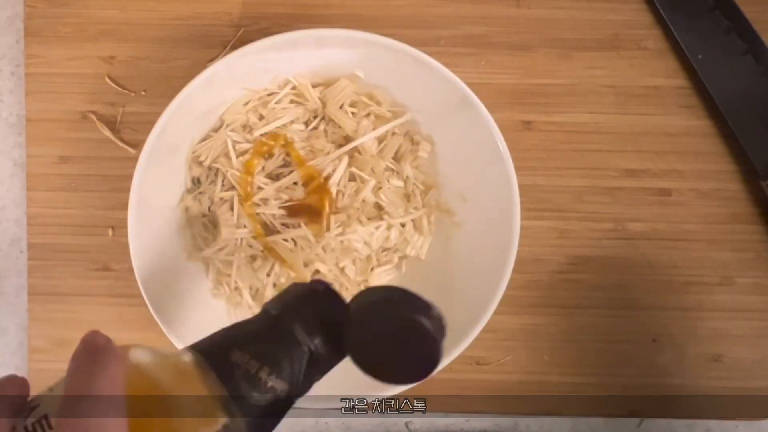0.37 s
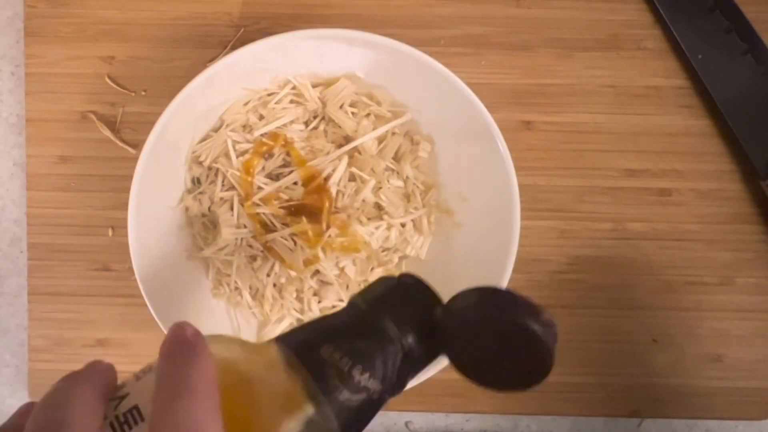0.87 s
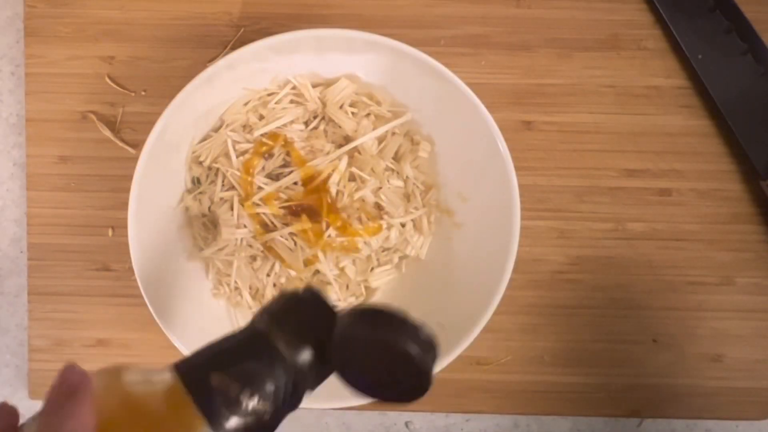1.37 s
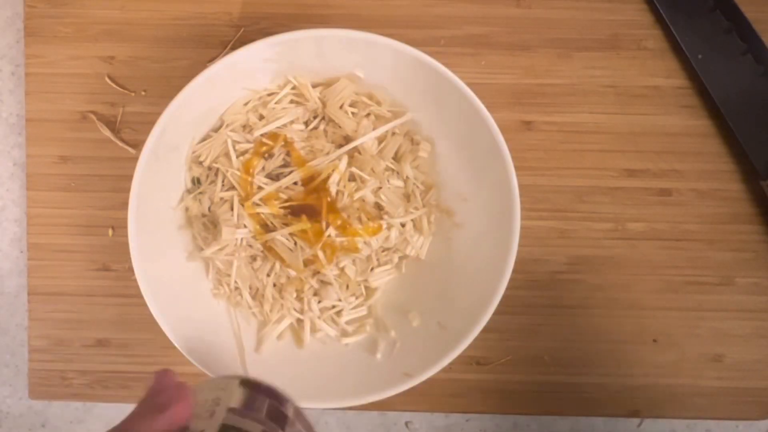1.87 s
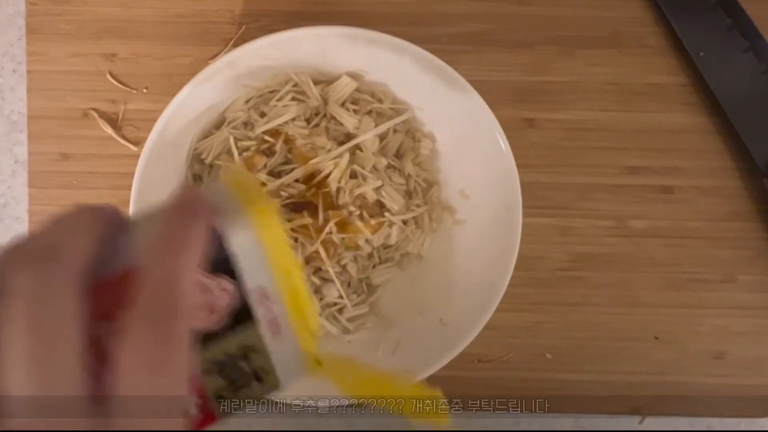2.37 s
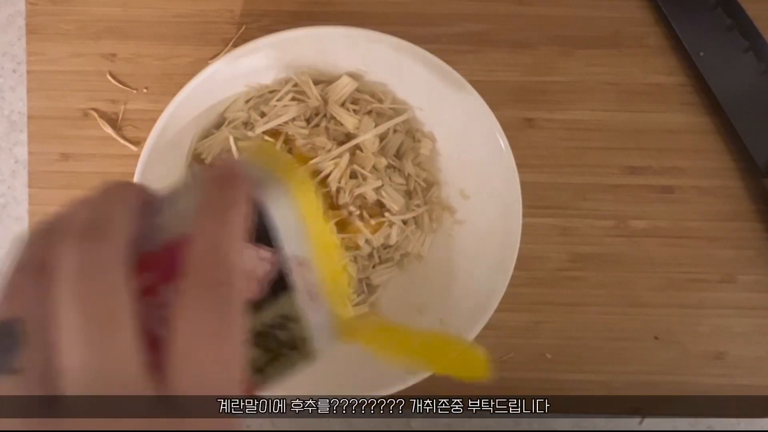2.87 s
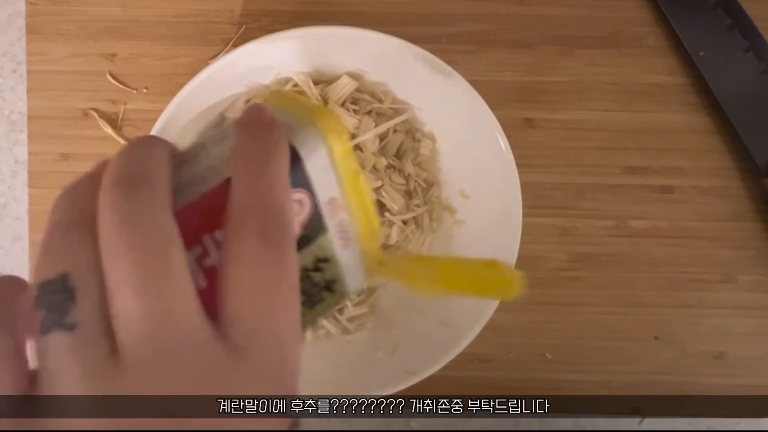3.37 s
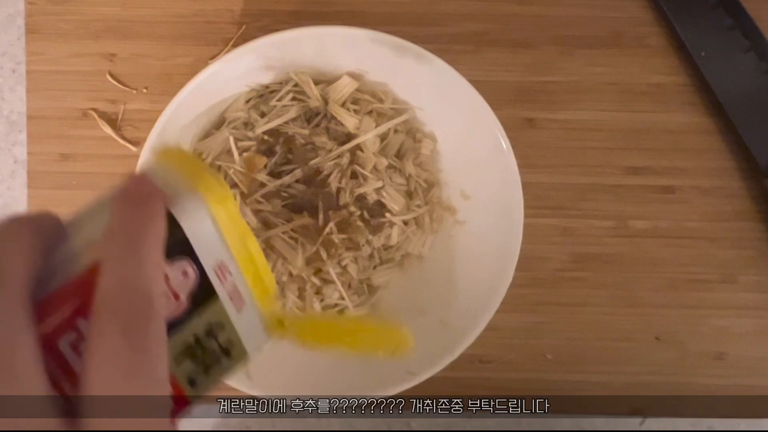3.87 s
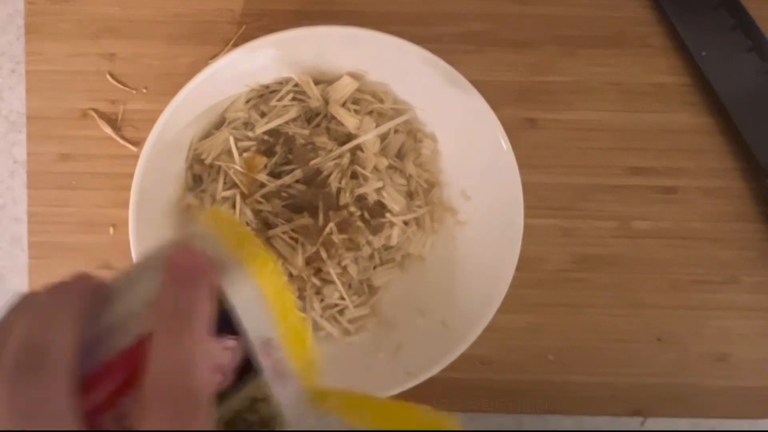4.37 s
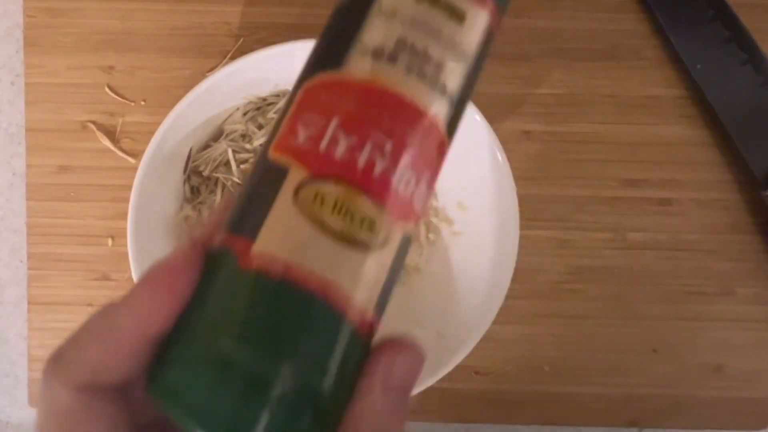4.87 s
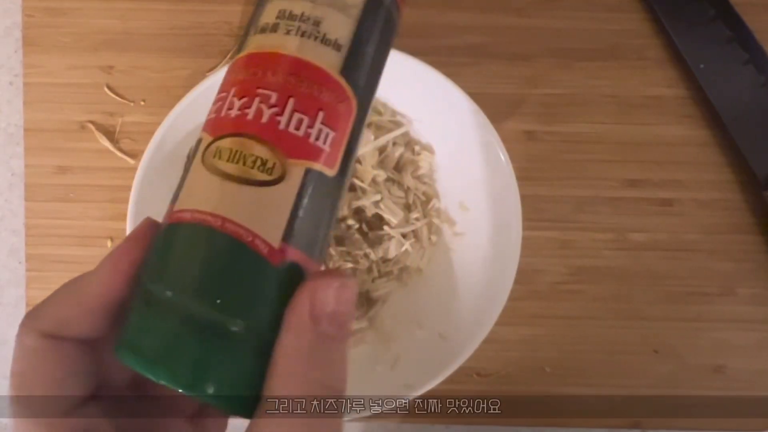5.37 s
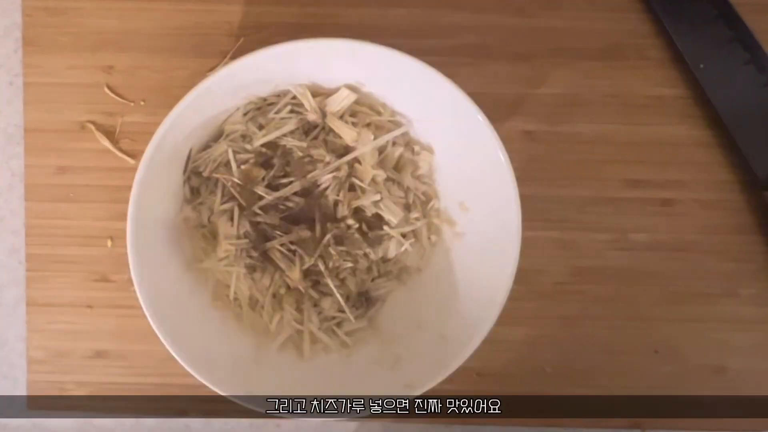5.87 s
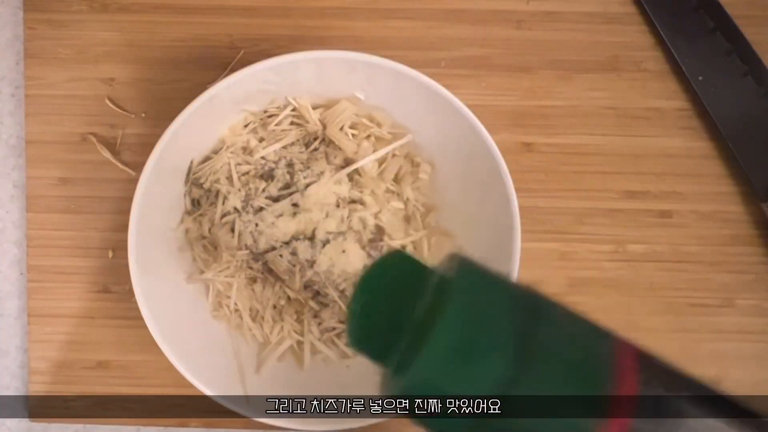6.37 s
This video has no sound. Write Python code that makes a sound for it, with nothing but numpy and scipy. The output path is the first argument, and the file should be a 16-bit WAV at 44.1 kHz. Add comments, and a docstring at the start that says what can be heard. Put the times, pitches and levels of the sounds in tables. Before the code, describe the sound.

A low electrical-sounding hum with a thin whine and airy rush runs through four shots, separated by tiny clicks and near silence. The first is almost only hum; the second has dry swishing pepper shakes; the third is quiet handling; the last has a crisp plastic lid tick and brief sliding powder. Near microphone in a small, dry kitchen.

```python
"""Seasoning by a humming motor

A pepper tin is shaken: swarms of tiny hits ring its walls. Hands rustle on plastic in the same way.
A shaker's lid ticks as short decaying tones; its tube and nozzle are noise in narrow resonances.
A motor hums and whines and its fan rushes; faint handling hiss and a small kitchen surround all this.
Three joins, each a clipped fade-out, near silence and a fade-in, part the sound into four shots."""
import sys
import numpy as np
from scipy import signal
from scipy.fft import rfft, irfft, next_fast_len
from scipy.io import wavfile

SR = 44100
rng = np.random.default_rng(int(sys.argv[2]) if len(sys.argv) > 2 else 0)


def gain_from_db(level_db):
    """Convert decibel levels to linear amplitude factors (20 dB per decade)."""
    decades = np.asarray(level_db, float) / 20
    return 10 ** decades


def put_to_file(sound):
    """Save the sound as 16-bit audio at rate SR, in the file named by the first command-line argument."""
    columns = np.atleast_2d(sound).T  # one column per channel
    safe = np.clip(columns, -1, 1)
    whole_steps = np.round(safe * 32767)
    wavfile.write(sys.argv[1], SR, whole_steps.astype(np.int16))


N = 286209   # samples

# pepper thrown about in the tin: start_s, level_db (before ringing), centre_hz,
# breadth_octaves (distance at which it is 9 dB down), rise_s
SHAKES = [(2.30, -74, 5020, 0.82, .02), (2.455, -70, 6500, 1.4, 0.024), (2.619, -85, 6950, 1.2, 0.01),
          (3.100, -69.5, 2380, 0.74, .005), (3.228, -72, 5400, 1.1, 0.011), (3.385, -73, 4520, 0.71, 0.026),
          (3.417, -59.5, 4000, 1.06, 0.016), (3.532, -56.5, 3400, 0.93, 0.026),
          (3.65, -81.5, 7500, 0.91, .025), (3.805, -68.5, 3000, 1.2, 0.011),
          (3.902, -54, 2570, 1.5, 0.0021), (3.94, -69.5, 2600, 1.1, .012),
          (4.108, -60.5, 1900, 0.37, 0.016), (4.164, -69, 2620, 1.4, 0.0049),
          (4.305, -72.5, 6540, 1.1, 0.018)]
# resonances of the tin's walls: pitch_hz, width_hz, relative_level_db
TIN_WALLS = [(1360, 540, -1), (1666, 430, 2.5), (2170, 480, -0.5), (2677, 260, 2.5), (3190, 180, -3.5),
             (3860, 960, -4.5), (4560, 490, -7), (5770, 380, -1.5), (6330, 480, -3.5), (6800, 600, -10),
             (8050, 800, -11.5), (10400, 3000, -11), (14000, 3200, -17)]
# fingers slipping on plastic and powder sliding: columns as in SHAKES
RUSTLES = [(.345, -87, 3440, 0.71, .03), (.441, -71, 2850, .4, 0.0039), (.455, -80, 4280, 0.49, 0.017),
           (1.589, -87, 14000, .33, .003), (1.608, -83, 5000, 0.61, 0.0065), (4.655, -86, 6000, 1.3, 0.023),
           (5.197, -87, 4900, 0.86, .02), (5.498, -81, 3980, 0.54, .012), (5.80, -87, 5500, 1.1, .03),
           (6.05, -66, 9100, 1.5, 0.027), (6.098, -68, 5980, 1.2, 0.017), (6.365, -100, 14000, .44, .015),
           (6.46, -72.5, 7050, 1.3, 0.023)]
# broad colour of the rustles: pitch_hz, width_hz, relative_level_db
PLASTIC_COLOUR = [(2300, 450, -6.5), (3000, 420, 6), (4200, 1300, 2.5), (6040, 3400, 7), (7500, 1400, -4),
                  (10700, 3500, -0.5), (14500, 2500, -6.5)]
SHAKE_T60_S, RUSTLE_T60_S = 0.2, 0.13

# ticks of the shaker lid: start_s, level_db (before onset ramp and decay), pitch_hz
LID_TICKS = [(6.065, -44, 9000), (6.076, -21, 5830), (6.0945, -40, 3680), (6.1042, -44, 4200)]
TICK_T60_S = 0.0037

# air in the shaker's tube as it is tipped: swells until TUBE_FULL_S, then holds
TUBE_HZ, TUBE_WIDTH_HZ = 2370, 110
TUBE_FULL_S, TUBE_DB, TUBE_SWELL_DB_PER_S = 6.43, -65, 77.5

# breathy nozzle tones: pitch_hz, width_hz (of each of two filters), relative_level_db
NOZZLE_TONES = [(4500, 400, -1), (6000, 350, 0), (7570, 350, -2)]
NOZZLE_FROM_S, NOZZLE_TO_S, NOZZLE_EDGE_S, NOZZLE_DB = 1.57, 1.99, 0.05, -92

# hands and sleeves moving: time_s, level_db (rms, before flicker)
HANDLING_LEVEL = [(0, -87.5), (.5, -82), (1, -85), (1.9, -82), (2.4, -80.5), (3.2, -78), (3.7, -74),
                  (4.05, -79.5), (4.4, -74), (4.8, -81.5), (5.6, -83.5), (5.9, -76.5), (6.2, -79),
                  (6.43, -77.5), (6.49, -65.5)]
# colour of the handling hiss: frequency_hz, relative_density_db (per Hz)
HANDLING_COLOUR = [(1500, -20), (3000, -3.5), (4500, 3.5), (5500, 3), (8000, -2.5), (11000, -9.5),
                   (15000, -12)]

HUM_HZ = 59.385   # the running speed
# motor hum: multiple of the running speed, left_level_db (rms), right_level_db (rms)
HUM_TONES = [(1, -33.5, -33.5), (2, -55, -58), (3, -61.5, -60.5), (4, -63, -65), (5, -67.5, -70),
             (7, -63, -89.5), (10, -67, -57.5)]

# whine in each shot: shot_end_s, level_db (rms, midway between the channels, before wavering)
WHINE_SHOTS = [(2.05, -74), (4.47, -77), (5.97, -78), (6.5, -72)]
WHINE_HZ, WHINE_SPREAD_HZ = 2262, 34

# fan rush: frequency_hz, relative_density_db (per Hz)
RUSH_COLOUR = [(15, -23.5), (36, -12.5), (82, -2.5), (140, -10.5), (300, -12), (450, -18.5), (600, -9),
               (880, -21), (1100, -20), (1500, -28.5), (2100, -32.5), (2900, -41.5), (4500, -57.5),
               (8000, -58.5), (14000, -77.5)]
RUSH_DB = -50   # rms
# housing resonances rung by the air flow: pitch_hz, width_hz, level_db (rms), left_minus_right_db
HOUSING = [(157, 12, -60.5, 0), (268, 14, -61, -1.5), (548.2, 30, -62.5, 2.5), (633.7, 23, -62, -10.5),
           (962.5, 32, -64.5, -5), (1191, 22, -78.5, -2.5), (1325, 70, -70.5, -3), (1727, 55, -79.5, -3),
           (2960, 450, -108.5, -2.5), (9450, 150, -104.5, -2)]

KITCHEN_T60_S, KITCHEN_DB = 0.12, -3.5
# likeness of spread-out sound at the two microphone ports: frequency_hz, likeness (0-1)
LIKENESS = [(60, .998), (200, 0.98), (300, 0.7), (400, 0.6), (550, 0.6), (700, 0.07), (1800, 0.5),
            (2500, 0), (4000, 0.2), (7000, 0.2), (14000, 0.6)]
# delay of the left port by the housing: frequency_hz, lag_cycles
PORT_LAG = [(20, 0), (60, .0027), (500, .01), (900, .5), (1500, 1), (2100, 1.05), (2600, 1.5), (3500, 2),
            (4300, 2.06), (5200, 2.35), (7000, 2.5), (8000, 3), (8800, 3.24), (16000, 3.26)]

# joins: cut_s, fade_in_start_s, jump_db (offset of the wave at the cut)
JOINS = [(2.0208, 2.061, -47.5), (4.435, 4.498, -58), (5.9438, 6.005, -45)]
FADE_OUT_S, CUT_LEVEL_DB, FADE_IN_S, FADE_IN_CURVE = 0.081, -10.5, 0.15, 1.48
AFTER_CUT_DB, AFTER_CUT_DB_PER_S = -43, -1200   # a faint trace dies into silence


def rms_one(x):
    """Scales to rms 1."""
    return x / np.sqrt(np.mean(x ** 2) + 1e-20)


def at_hz(points, size):
    """Reads a frequency curve at the bins of a transform, on a log frequency scale."""
    hz, value = np.transpose(points)
    bins_hz = np.arange(size // 2 + 1) * SR / size
    return np.interp(np.log(bins_hz + 1e-3), np.log(hz), value)


def drift(rate):
    """Slow random wander of rms 1, changing about rate times a second."""
    r = np.exp(-2 * np.pi * rate / SR)
    wander = signal.lfilter([1], [1, -2 * r, r * r], rng.standard_normal(N + SR))
    return rms_one(wander[SR:])   # the first second settles the filter


def resonate(x, hz, width):
    """Two-pole resonance with gain 1 on top."""
    r = np.exp(-np.pi * width / SR)
    poles = [1, -2 * r * np.cos(2 * np.pi * hz / SR), r * r]
    return signal.lfilter([(1 - r * r) / 2, 0, (r * r - 1) / 2], poles, x + 1e-18)


def panned(x, left_minus_right_db):
    """Two channels from one, by level alone."""
    return x * gain_from_db(np.array([[0.5], [-0.5]]) * left_minus_right_db)


def coloured(spectrum):
    """Stereo noise of a given spectrum and rms 1, as alike at the ports as LIKENESS says."""
    size = next_fast_len(N)
    alike = np.clip(at_hz(LIKENESS, size), 0, 1)
    mid, side = rfft(rng.standard_normal((2, size))) * gain_from_db(at_hz(spectrum, size))
    both = np.sqrt(1 + alike) * mid + np.sqrt(1 - alike) * side * [[1], [-1]]
    return rms_one(irfft(both, size)[:, :N])


def grain_bursts(events, modes, t60, per_s, spread_db):
    """Each burst is a swarm of tiny hits that swells, dies away and rings modes around its centre pitch."""
    struck = rng.random(N) < per_s / SR
    size = gain_from_db(spread_db * np.minimum(rng.exponential(1, N), 4))
    grains = rms_one(struck * size * rng.choice([-1, 1], N))
    dealt = rng.random((len(modes), N)) < 0.5   # each mode gets its own half of the hits
    out = np.zeros(N)
    for hits, (hz, width, mode_db) in zip(dealt * grains, modes):
        swell = np.zeros(N)
        for s, db, centre_hz, octaves, rise in events:
            first = int(s * SR)
            t = np.arange(min(SR // 2, N - first)) / SR
            attack = np.minimum(t / max(rise, 1e-3), 1)
            decay = gain_from_db(-60 * np.maximum(t - rise, 0) / t60)
            distance = np.log2(hz / centre_hz) / octaves
            swell[first:][:len(t)] += attack * decay * gain_from_db(db - 9 * distance ** 2)
        rung = resonate(resonate(hits * swell, hz, width), hz, 3 * width)   # twice: steep skirts
        out += gain_from_db(mode_db) * rung * np.sqrt(SR / width)   # evens out narrow and wide modes
    return out


def pepper_tin():
    """Pepper grains strike the tin and ring its walls."""
    return grain_bursts(SHAKES, TIN_WALLS, SHAKE_T60_S, per_s=3700, spread_db=2.5)


def plastic_rustles():
    """Many small slips of skin and powder excite the broad resonances of plastic."""
    return grain_bursts(RUSTLES, PLASTIC_COLOUR, RUSTLE_T60_S, per_s=4500, spread_db=1.0)


def lid():
    """Dry ticks of hard plastic: fast-decaying tones whose first two cycles ramp up."""
    out, t = np.zeros(N), np.arange(SR // 20) / SR
    for s, db, hz in LID_TICKS:
        onset = np.minimum(t * hz / 2, 1)
        tick = gain_from_db(db - 60 * t / TICK_T60_S) * onset * np.sin(2 * np.pi * hz * t)
        out[int(s * SR):][:len(t)] += tick
    return out


def tube():
    """Noise in one hollow resonance, swelling as the tube is tipped."""
    air = resonate(rng.standard_normal(N), TUBE_HZ, TUBE_WIDTH_HZ)
    air = resonate(air, TUBE_HZ, TUBE_WIDTH_HZ)
    until_full = np.minimum(np.arange(N) / SR - TUBE_FULL_S, 0)
    return rms_one(air) * gain_from_db(TUBE_DB + TUBE_SWELL_DB_PER_S * until_full)


def nozzle():
    """Breathy pipe tones: noise in narrow resonances, each wandering in level."""
    air, t = rng.standard_normal(N), np.arange(N) / SR
    flowing = np.clip(np.minimum(t - NOZZLE_FROM_S, NOZZLE_TO_S - t) / NOZZLE_EDGE_S, 0, 1)
    out = np.zeros(N)
    for hz, width, db in NOZZLE_TONES:
        tone = rms_one(resonate(resonate(air, hz, width), hz, width))
        out += flowing * gain_from_db(NOZZLE_DB + db + 5.6 * drift(15)) * tone
    return out


def handling():
    """Faint cloth and skin hiss: coloured noise that flickers in level."""
    s, db = np.transpose(HANDLING_LEVEL)
    level_db = np.interp(np.arange(N) / SR, s, db)
    return gain_from_db(level_db + 1.3 * drift(9)) * coloured(HANDLING_COLOUR)


def hum():
    """Motor tones at steady multiples of the running speed that waver slightly in level together."""
    turn = 2 * np.pi * HUM_HZ * np.arange(N) / SR
    tones = np.zeros((2, N))
    for k, left_db, right_db in HUM_TONES:
        start = rng.uniform(0, 2 * np.pi)
        tones += np.sin(k * turn + start) * gain_from_db(np.array([[left_db], [right_db]]))
    return np.sqrt(2) * tones * gain_from_db(0.25 * drift(2))   # root two: sine of rms 1


def whine():
    """The motor's thin whine: a narrow band of noise about one pitch, stronger on the left."""
    ends, db = np.transpose(WHINE_SHOTS)
    t = np.arange(N) / SR
    turn = 2 * np.pi * WHINE_HZ * t
    band = drift(WHINE_SPREAD_HZ) * np.cos(turn) + drift(WHINE_SPREAD_HZ) * np.sin(turn)
    shot = np.minimum(np.searchsorted(ends, t), len(db) - 1)
    return gain_from_db(db[shot] + 1.5 * drift(1.5)) * panned(band, 9)


def fan():
    """Broad rush plus narrow bands where the housing rings, each partly unrelated at the two ports."""
    out, white = gain_from_db(RUSH_DB) * coloured(RUSH_COLOUR), rng.standard_normal((3, N))
    for hz, width, db, pan_db in HOUSING:
        each = width * 1.5   # two filters in a row narrow the band to about the given width
        shared, left, right = resonate(resonate(white, hz, each), hz, each)
        alike = np.clip(np.interp(hz, *np.transpose(LIKENESS)), 0, 1)
        ringing = np.sqrt(alike) * shared + np.sqrt(1 - alike) * np.array([left, right])
        out += gain_from_db(db) * panned(rms_one(ringing), pan_db)
    return out * gain_from_db(0.5 * drift(14))


def kitchen(x):
    """Room reverberation: a dense tail of decaying noise, another one at each port."""
    t = np.arange(SR // 2) / SR
    tails = rng.standard_normal((2, len(t))) * gain_from_db(-60 * t / KITCHEN_T60_S) * (t > 0.003)
    tails /= np.sqrt(np.sum(tails ** 2, axis=1, keepdims=True))
    return signal.fftconvolve(x[None], tails, axes=1)[:, :N]


def ports(x):
    """The housing makes the left port hear everything late by an amount that depends on pitch."""
    spare = SR // 10   # mirrored run-in and run-out
    longer = np.pad(x[0], spare, mode="reflect", reflect_type="odd")
    size = next_fast_len(len(longer))
    late = irfft(rfft(longer, size) * np.exp(-2j * np.pi * at_hz(PORT_LAG, size)), size)
    return np.array([late[spare:spare + N], x[1]])


def scene():
    """Near sounds with their room, over the motor and fan."""
    near = panned(pepper_tin(), 1.5) + panned(plastic_rustles() + nozzle(), 0.3) + panned(tube(), 6)
    ticks = lid()   # closest to the ports, so less of the room
    room = gain_from_db(KITCHEN_DB) * kitchen(near.mean(axis=0) + gain_from_db(-11.5) * ticks)
    return near + panned(ticks, -2) + room + handling() + hum() + whine() + fan()


def roll_off(x):
    """The treble ends steeply here."""
    return signal.sosfilt(signal.butter(12, 15750, fs=SR, output="sos"), x)


def record(dry):
    """At each join the fade-out is cut short with a jump in the wave; near silence, then a fade-in."""
    t, gain, jumps = np.arange(N) / SR, np.ones(N), np.zeros(N)
    for cut_s, in_s, jump_db in JOINS:
        fade_times = [cut_s - FADE_OUT_S, cut_s - 0.003, cut_s]
        fade_out = np.interp(t, fade_times, [1, gain_from_db(CUT_LEVEL_DB), 0])
        fade_in = np.clip((t - in_s) / FADE_IN_S, 0, 1) ** FADE_IN_CURVE
        trace = gain_from_db(AFTER_CUT_DB + AFTER_CUT_DB_PER_S * np.maximum(t - cut_s, 0))
        gain *= np.where(t < cut_s, fade_out, np.maximum(fade_in, trace))
        ramp = np.clip(1 - (cut_s - t) / 0.0012, 0, 1)   # rises over 1.2 ms, then drops at the cut
        jumps += gain_from_db(jump_db) * ramp * (t < cut_s)
    return roll_off(ports(dry) * gain + jumps)


dry = scene()
out = record(dry)
put_to_file(out)
```